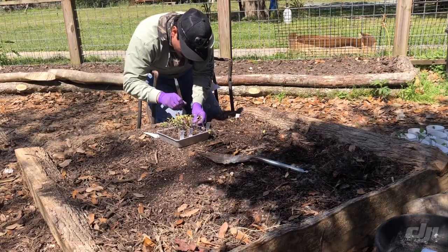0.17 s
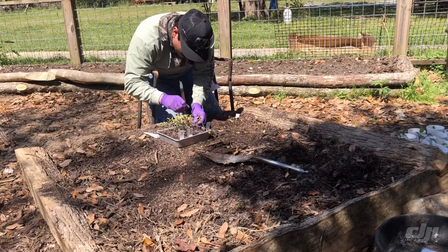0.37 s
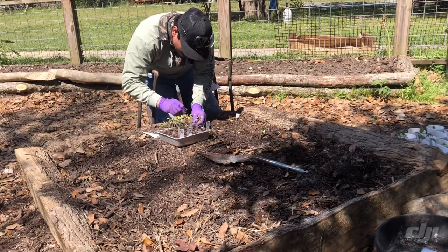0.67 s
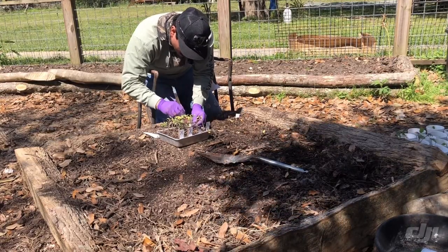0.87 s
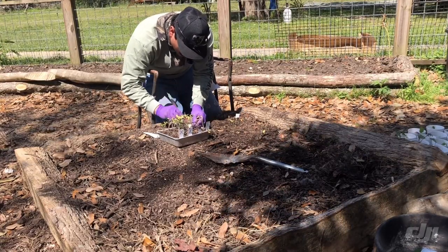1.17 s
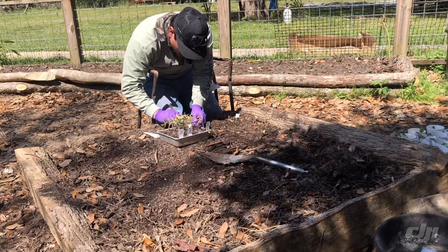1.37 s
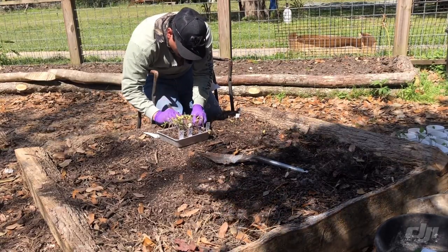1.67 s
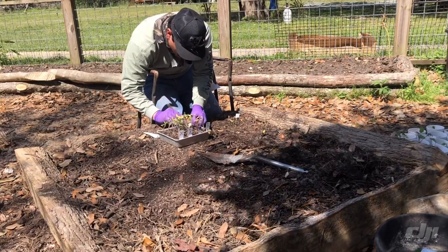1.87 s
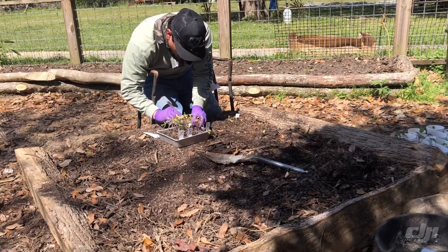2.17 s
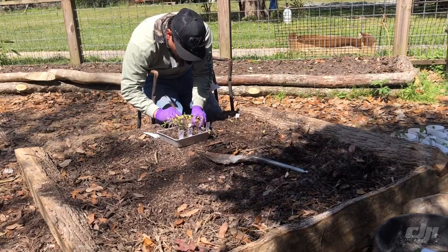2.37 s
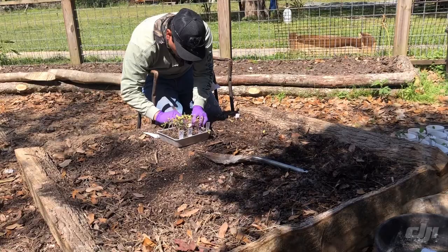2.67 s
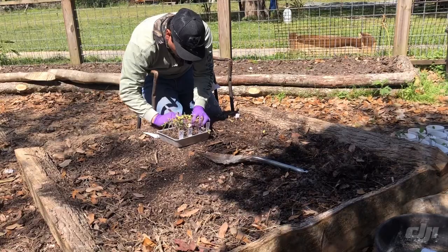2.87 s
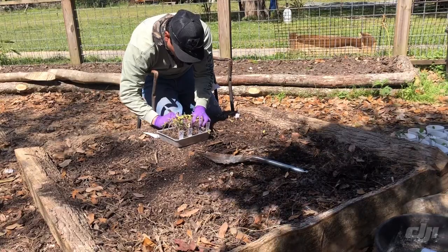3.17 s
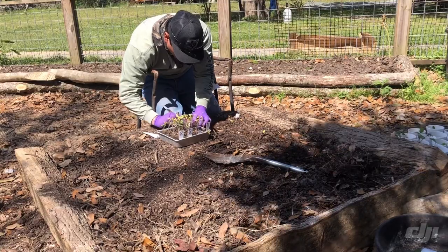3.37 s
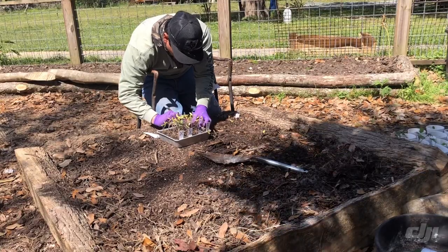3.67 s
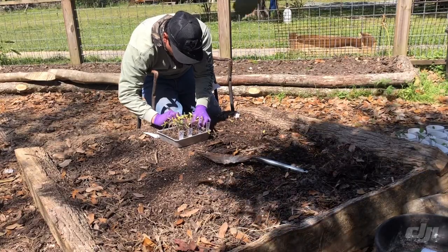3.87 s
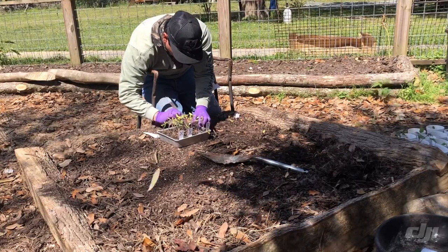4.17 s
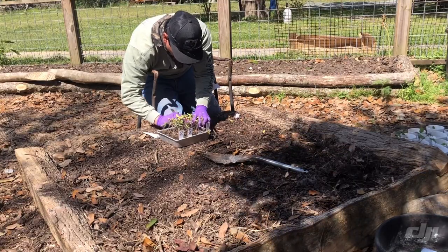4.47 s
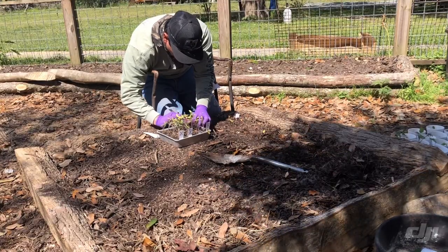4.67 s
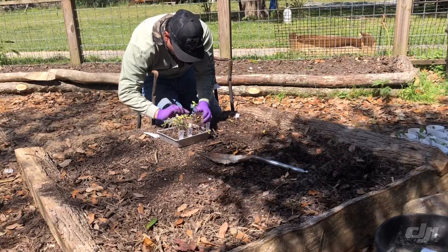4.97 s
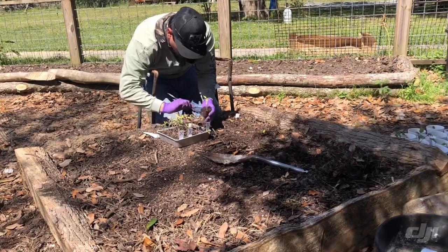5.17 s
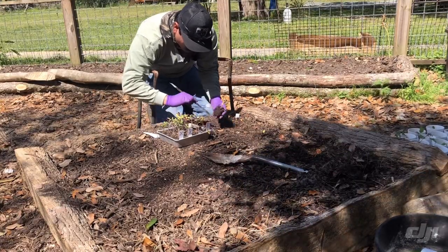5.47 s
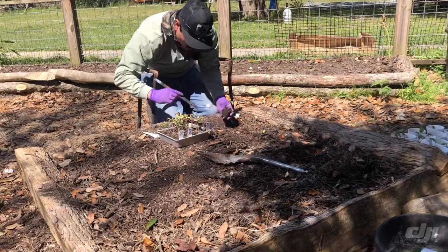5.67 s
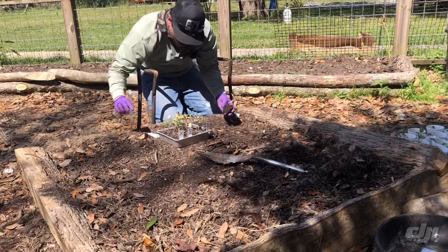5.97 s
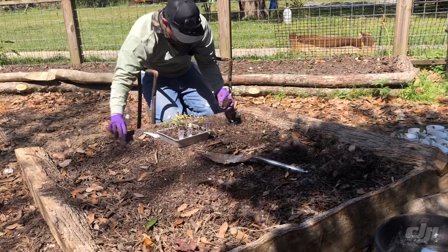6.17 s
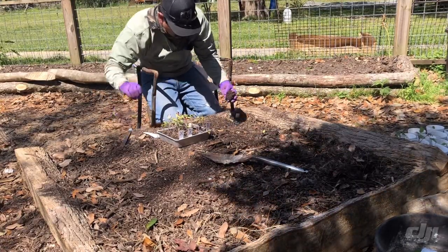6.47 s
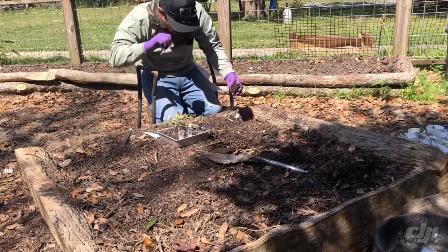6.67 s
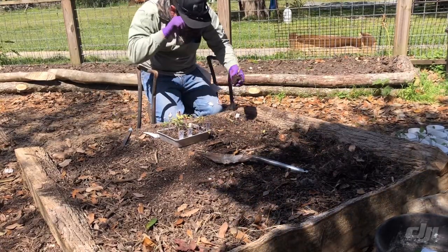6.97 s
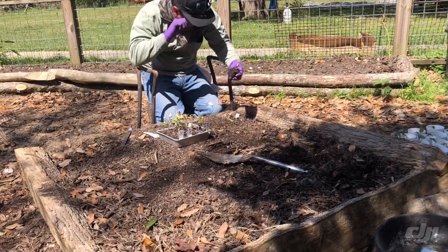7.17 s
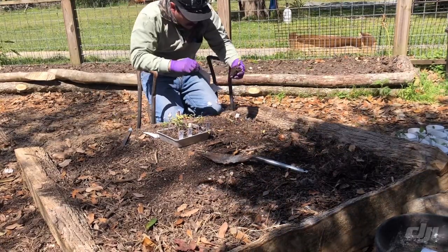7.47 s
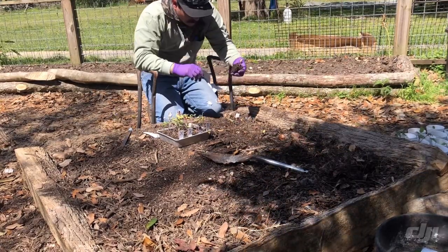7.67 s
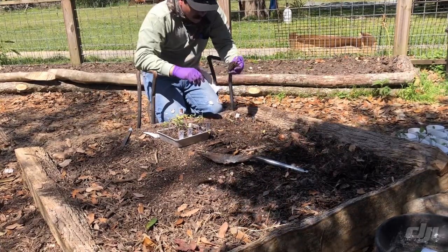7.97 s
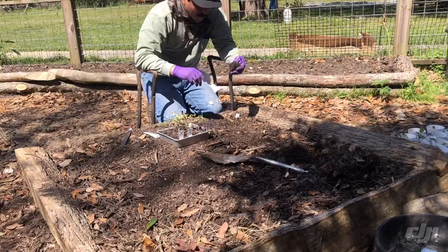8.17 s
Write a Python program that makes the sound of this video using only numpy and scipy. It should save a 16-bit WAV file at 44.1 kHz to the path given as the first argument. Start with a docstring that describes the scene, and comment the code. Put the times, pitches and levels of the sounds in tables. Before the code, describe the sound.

Close muffled cloth bumps and dry soil ticks as a gardener handles seedlings; a far rooster crows hoarsely, then faint bird chirps follow.

```python
"""Rooster across a garden

A rooster crows once far off: pulses of a two-sided syrinx, partly chaotic, pass through throat resonances.
Near by a gardener lifts seedlings from a tray: cloth thumps and rubs on a clip-on microphone (soft pulses),
soil and leaves tick (ringing grains), stems and tray snap (noise bursts) and metal rings in its modes.
Far birds chirp as wavering sines; crow and chirps get scattered echoes, over a wash of coloured noise.
"""
import sys
import numpy as np
from scipy import signal
from scipy.fft import rfft, irfft, next_fast_len
from scipy.io import wavfile
from scipy.ndimage import uniform_filter1d, map_coordinates

SR = 44100
rng = np.random.default_rng(int(sys.argv[2]) if len(sys.argv) > 2 else 0)


def inscribe(sig):
    """Save sig as 16-bit PCM at rate SR to the path in sys.argv[1].

    A 1-D sig is mono; a 2-D sig holds one channel per row.
    Samples are clipped to [-1, 1] before scaling.
    """
    pcm = np.round(np.clip(np.atleast_2d(sig).T, -1, 1) * 32767)
    wavfile.write(sys.argv[1], SR, pcm.astype(np.int16))


N = 367176
TIME = np.arange(N) / SR


def amp(db):
    """Decibels to amplitude ratio."""
    return 10 ** (np.asarray(db) / 20)


def evened(x):
    """Normalisation to rms 1."""
    return x / np.sqrt(np.mean(x ** 2) + 1e-20)


def steadied(x, size=1800):
    """Levelling: division by the running rms over size samples."""
    return x / np.sqrt(abs(uniform_filter1d(x ** 2, size)) + 1e-12)


def read(points, hz):
    """Linear interpolation of a spectrum table on a log-frequency axis."""
    f, value = np.transpose(points)
    return np.interp(np.log(hz + 1), np.log(f), value)


def curves(rows, t):
    """Linear interpolation of each column of a time table at the times t."""
    s, *columns = np.transpose(rows)
    return [np.interp(t, s, c) for c in columns]


def coloured(x, points):
    """Spectral shaping: each frequency is scaled by a table of dB."""
    gain = amp(read(points, np.fft.rfftfreq(len(x), 1 / SR)))
    return irfft(rfft(x) * gain, len(x))


def below(x, hz, order=4):
    """Zero-phase low-pass filtering: forwards, then backwards."""
    sos = signal.butter(order, min(hz, SR * .49), fs=SR, output="sos")
    return signal.sosfiltfilt(sos, x)


def wander(count, hz):
    """Random modulation: noise of rms 1, low-passed at hz."""
    noise = rng.standard_normal(count + 8000)
    return evened(below(noise, hz, order=2)[4000:4000 + count])


def add(mix, s, sound):
    """Superposition: mixes a sound in at time s."""
    part = mix[max(round(s * SR), 0):][:len(sound)]
    part += sound[:len(part)]


def strokes(rows, size=900):
    """Gain envelope of a series of hand movements, their ends softened by a moving average."""
    gates = sum(amp(db) * (TIME > start) * (TIME < end) for start, end, db in rows)
    return uniform_filter1d(gates, size)


def air(level_db=-60, fade_db_per_s=.5, swell_db=1.5):
    """Broadband noise: the dull wash of the outdoors, randomly swelling and slowly dying down."""
    # Each row: frequency in Hz, relative spectral level in dB per Hz.
    spectrum = [(20, -41), (40, -10), (65, 2.5), (120, -1.5), (200, -13), (320, -17.5), (1000, -22.5),
                (2000, -30.5), (3700, -37.5), (9000, -43.5), (15800, -52.5)]
    wash = coloured(rng.standard_normal(N), spectrum)
    middle = below(wash, 4500) - below(wash, 354)  # the band that sets the level
    fade_db = fade_db_per_s * (TIME - TIME.mean())
    return wash / middle.std() * amp(level_db - fade_db + swell_db * wander(N, 13.0))


def soil(idle_db=-75.0, grains_per_s=6000, spread_db=2.0, clump_db=3.5):
    """Granular excitation: crumbs and leaf scraps tick in clumps under the hands, faintly in between."""
    # Hands in soil and leaves. Each row: start in seconds, end in seconds, level in dB.
    rustles = [(.78, .85, -67), (3.66, 3.72, -66), (3.758, 3.79, -67), (3.885, 3.99, -63.5),
               (4.085, 4.21, -67.5), (4.25, 4.3, -67), (4.33, 4.42, -64), (4.48, 4.57, -64),
               (4.67, 4.75, -65.5), (5.298, 5.325, -62), (5.508, 5.53, -61), (6.145, 6.2, -67),
               (6.31, 6.38, -64.5), (6.72, 6.82, -70), (7.314, 7.36, -62), (7.46, 7.53, -69.5),
               (8, 8.15, -71.5)]
    # Colour of the ticks. Each row: frequency in Hz, gain in dB.
    tick_colour = [(300, -26), (1200, -8.5), (2500, 3), (4500, 5), (7000, 4), (10000, 0), (15500, -2)]
    t, ticks = np.arange(256) / SR, np.zeros(N)
    pitches = np.geomspace(1300, 14000, 16)
    for hz in pitches:
        sizes_db = spread_db * np.minimum(rng.exponential(1, N), 4) + clump_db * wander(N, 45)
        signs = rng.choice([-1, 1], N)
        grains = amp(sizes_db) * signs * (rng.random(N) < grains_per_s / len(pitches) / SR)
        # each scrap rings for a few cycles at its own pitch
        ring = np.sqrt(hz) * np.sin(2 * np.pi * hz * t) * np.exp(-hz * t / 0.79)
        ticks += signal.oaconvolve(grains, ring)[:N]
    level = np.hypot(strokes(rustles, size=500), amp(idle_db))
    return evened(coloured(ticks, tick_colour)) * level


def thump(hz, sag=0.42, cycles=1.0, edge_db=-16, edge_ratio=2.185):
    """Damped displacement: a soft pulse sags in pitch as fabric settles, led by a brief brighter catch."""
    u = np.arange(-3, 5, hz / SR)  # time in cycles, the pulse centred at 0
    turns = (1 - np.exp(-sag * u)) / sag
    push = np.exp(-(turns / cycles) ** 2) * np.cos(2 * np.pi * (turns + rng.random()))
    catch_shape = np.exp(-(edge_ratio * (u + .5)) ** 2)
    catch = catch_shape * np.cos(2 * np.pi * (edge_ratio * u + rng.random()))
    return push + amp(edge_db) * catch


def cloth(rub_db=1.5, rub_low_hz=60, rub_high_hz=210, slips_per_s=16, spread_db=3.0):
    """Stick-slip friction: rubbing is a patter of small slips of many pitches, beside single heavy bumps."""
    # Cloth bumping the microphone. Each row: time in seconds, level in dB, pitch in Hz.
    bumps = [(0.676, -25, 149), (0.731, -25, 88.5), (0.85, -29, 378), (.856, -30, 400), (.871, -21.5, 171),
             (0.881, -15.5, 587), (0.891, -17.5, 433), (0.898, -14.5, 209), (.907, -22.5, 380),
             (.931, -25.5, 210), (0.944, -16, 243), (.954, -26.5, 375), (1.06, -33.5, 200),
             (1.243, -29.5, 119), (1.345, -24, 113), (1.87, -26.5, 101), (2.157, -22.5, 315),
             (2.166, -26, 184), (2.302, -23, 132), (2.809, -26.5, 130), (2.826, -29, 147), (2.91, -22, 173),
             (2.926, -24, 76.4), (3.045, -24, 146), (3.16, -31, 226), (3.2, -29, 90.5),
             (3.431, -30.5, 88.1), (3.46, -31, 195), (3.689, -31, 113), (4.274, -33, 161),
             (4.953, -20.5, 266), (4.997, -35, 200), (5.088, -27, 246), (5.153, -25.5, 260),
             (5.41, -26.5, 187), (5.464, -36, 151), (5.544, -23, 125), (5.588, -21.5, 228),
             (5.606, -22.5, 134), (5.741, -30.5, 169), (5.898, -20.5, 116), (6.024, -34, 135),
             (6.112, -23.5, 115), (6.598, -29, 111), (6.618, -28, 106), (6.639, -26.5, 141),
             (6.678, -32.5, 225), (6.693, -29, 80.5), (6.725, -29.5, 108), (6.821, -32, 148),
             (6.842, -44, 950), (6.971, -34.5, 124), (7.016, -34.5, 191), (7.059, -28, 112),
             (7.18, -32, 216), (7.2, -26, 232), (7.229, -25.5, 131), (7.597, -31, 179), (7.652, -28, 108),
             (7.857, -26.5, 155), (7.969, -24.5, 107), (8.091, -32.5, 156)]
    # Cloth rubbing on it. Each row: start in seconds, end in seconds, level in dB before the lift rub_db.
    rubs = [(0.17, 0.25, -44.5), (0.33, 0.64, -49), (0.65, 0.76, -34.5), (0.86, 0.965, -30),
            (0.98, 1.15, -40.5), (1.22, 1.5, -45), (1.72, 1.95, -44), (2.09, 2.23, -35),
            (2.78, 3.27, -40.5), (3.4, 3.82, -46), (3.89, 3.99, -48.5), (4.1, 4.53, -46.5),
            (4.96, 5.2, -35.5), (5.34, 5.67, -35), (5.72, 6.14, -41), (6.58, 6.75, -38.5),
            (6.8, 7.42, -45.5), (7.56, 7.7, -39), (7.84, 8.16, -48)]
    out, rub = np.zeros(N), np.zeros(N)
    for s, db, hz in bumps:
        add(out, s - 3 / hz, amp(db) * thump(hz))  # the pulse centres 3 cycles in
    for hz in np.geomspace(rub_low_hz, rub_high_hz, 10):
        slips = (rng.random(N) < slips_per_s / SR) * amp(spread_db * rng.standard_normal(N))
        rub += signal.oaconvolve(slips, thump(hz))[:N]
    thuds = out + steadied(rub, size=4000) * strokes(rubs) * amp(rub_db)
    return thuds - below(thuds, 32.0, order=2)  # the small capsule loses the deepest bass


def clink(s, modes, db, rise_s, t60):
    """Modal vibration: metal rings in its modes, at once when struck, swelling when scraped."""
    out, t = np.zeros(N), np.arange(SR // 2) / SR
    ring = sum(amp(level) * np.sin(2 * np.pi * hz * t) * (1 + 0.15 * wander(len(t), 60))
               for hz, level in modes)
    add(out, s, amp(db - 60 * t / t60) * ring * (1 - np.exp(-t / rise_s)))
    return out


def metal():
    """Free vibration of two metal bodies: a scraped trowel and later a struck tool."""
    # Modes of the trowel, then of the tool. Each row: frequency in Hz, relative level in dB.
    trowel_modes = [(3321, 1.5), (4760, -2), (6794, -2), (7494, -13)]
    tool_modes = [(1412, -0.5), (2290, -9), (3445, -8), (5120, -11), (5814, -9), (6837, -13), (7620, -10),
                  (9297, -9), (10200, -13), (12700, -9), (14850, -14)]
    scrape = clink(.688, trowel_modes, db=-56.0, rise_s=0.014, t60=0.39)
    return scrape + clink(6.261, tool_modes, db=-53.0, rise_s=.001, t60=0.4)


def snaps(crack_s=0.0011, tail=0.86, crunch_db=4, ring_db=7, ring_width_hz=1500, lead=0.1):
    """Fracture noise: a faint creak, a sharp crack with a broad ring, then a short uneven crunch."""
    # Stems, leaves and the plastic tray, and at 6.26 s the strike of the metal tool. Each row: time in seconds,
    # level of the crack in dB, t60 in seconds, gain of the body below 4.8 kHz in dB, ring in Hz.
    fractures = [(0.714, -52, 0.033, -15, 6840), (0.725, -56.5, 0.12, -8, 4700),
                 (3.0988, -56, 0.07, 9.5, 5230), (3.6489, -58.5, 0.19, 7.5, 7970),
                 (4.143, -68.5, 0.08, 16, 4000), (4.229, -49, 0.038, 0, 4470),
                 (4.374, -63, .025, 7.5, 3800), (4.618, -56, 0.04, -3, 4670), (5.08, -62, 0.035, 6.5, 4370),
                 (5.179, -63, .015, -0.5, 3800), (5.312, -53.5, 0.08, 3, 4850),
                 (5.587, -36, 0.029, -3, 8400), (5.8158, -55, 0.092, -8, 4530),
                 (5.8472, -55.5, 0.091, -2, 8700), (6.072, -58, 0.05, 2.5, 4320),
                 (6.2613, -54, 0.37, 4, 12700), (6.6628, -52, 0.17, 2, 6600),
                 (6.6794, -46.5, 0.11, -24, 6230), (7.6111, -60.5, .02, 0, 4170),
                 (8.014, -58.5, 0.04, -1, 5500), (8.2828, -55, 0.13, -10, 6130)]
    # Colour common to all. Each row: frequency in Hz, gain in dB.
    crack_colour = [(500, 12.5), (1100, 5), (2500, 7.5), (5000, 1), (7500, 2.5), (11000, 1.5), (15500, -2)]
    out, t = np.zeros(N), np.arange(-1024, 7168) / SR
    hz = np.fft.rfftfreq(len(t), 1 / SR)
    for s, db, t60, low_db, ring_hz in fractures:
        crunch = tail * amp(-60 * abs(t) / t60 + crunch_db * wander(len(t), 130))
        shape = np.where(t < 0, lead * crunch, np.exp(-abs(t) / crack_s) + crunch)
        colour_db = read(crack_colour, hz) + ring_db / (1 + ((hz - ring_hz) / ring_width_hz) ** 2)
        burst = irfft(rfft(rng.standard_normal(len(t)) * shape) * amp(colour_db))
        body = below(burst, 4800)
        treble = burst - body
        crack = np.sqrt(uniform_filter1d(treble ** 2, size=180).max())  # loudest treble rms
        add(out, s + t[0], amp(db) * (treble + amp(low_db) * body) / crack)
    return out


def syrinx(hz, halves, jitter, stumble, pull=0, slip=0, taut_hz=820, slack=0.71):
    """Harmonic series of a pulse train; alternate strong and weak pulses add lines between the harmonics."""
    turns = np.cumsum(hz * (1 + jitter * wander(len(hz), 168.6))) / SR
    # each pulse lands a little early or late: low harmonics stay clear, high ones turn to haze
    phase = 2 * np.pi * (turns + pull + stumble * wander(len(hz), 470))
    # slacker membranes, at a lower pitch, close more softly and lose their top
    dull = slack * np.clip(1 - hz / taut_hz, 0, .15)
    # the way across the garden shifts each partial at random
    shifts = 2 * np.pi * rng.random((19, 2))
    pulses = np.zeros(len(hz))
    for k, (a, b) in enumerate(shifts, 1):
        # moving air makes the high partials swell and fade
        fading = amp(min(.35 * k, 3) * wander(len(hz), 16))
        lines = np.cos(k * phase + a) + halves * np.cos((k + .5) * phase + slip + b)
        pulses += fading * np.exp(-dull * max(k - 4, 0)) * lines
    return pulses


def rasping(hz, stumble, chaos=0.04554, lurch=.07, centre=.94, halves=1.0, fickle_db=4.5, slip_hz=70,
            air_share=.2):
    """Chaotic vibration: lurching pitch, fickle sliding subharmonics, a puff of air at each opening."""
    lurching_hz = hz * (centre + lurch * np.tanh(2 * wander(len(hz), 37.86)))
    opening = (1 + np.cos(2 * np.pi * np.cumsum(lurching_hz) / SR)) ** 2
    puffs = evened(rng.standard_normal(len(hz)) * opening)
    fickle = halves * evened(amp(fickle_db * wander(len(hz), 24)))
    slip = 2 * np.pi * np.cumsum(slip_hz * wander(len(hz), 18)) / SR
    pulses = evened(syrinx(lurching_hz, fickle, chaos, stumble, slip=slip))
    return evened(pulses + air_share * puffs)


def settling(t, rasp, lock_s=0.025, rasp_halves=0.3):
    """Mode locking: roughness, share of half lines and lifts of the partials as the voice locks and breaks."""
    # The voice locks out of its rasp into a tone, and each lock favours other partials.
    # Each row: start in seconds, end in seconds, roughness left from 0 to 1, share of half lines,
    # lift in dB of the fundamental, of the second harmonic, of the upper harmonics.
    locks = [(1.297, 1.37, 0.47, 0.1, 4.5, -2.5, -0.5), (1.368, 1.453, 0.08, 0.28, 7, 12.5, 13.5),
             (1.468, 1.51, 0.63, 0.53, 11, -4, 2), (1.622, 1.757, 0.41, 0.15, 1.5, 0, 2.5),
             (1.876, 2.065, 0.08, 0.028, -4, 0.5, 2), (2.182, 2.237, 0.37, 3.1, 2.5, -1.5, -1.5),
             (2.309, 2.394, 0, 0.72, -7, -1, -2), (2.88, 2.974, 0.37, 0.97, 0, 1, -0.5),
             (2.978, 3.151, 0.23, 0.46, -0.5, 6.5, -1.5), (3.162, 3.258, 0.06, 0.06, 11.5, -12, -6),
             (3.278, 3.317, 0.02, .06, 4, 8.5, 2.5)]
    grips = np.array([np.clip(np.minimum(t - start, end - t) / lock_s + .5, 0, 1)
                      for start, end, *_ in locks])
    grips /= np.maximum(grips.sum(0), 1)
    loose = 1 - grips.sum(0)
    rough, halves, *lifts_db = np.array(locks)[:, 2:].T @ grips
    return np.clip(rough + loose * rasp, 0, 1), halves + loose * rasp_halves, lifts_db


def throat(x, resonances):
    """Resonance of a tube: steep-sided peaks with dark valleys, and little below 500 Hz."""
    hz = np.fft.rfftfreq(len(x), 1 / SR)
    gain = sum(amp(db) / (1 + (1.87 * (hz - f) / width) ** 2) ** 2 for f, width, db in resonances)
    return irfft(rfft(x) * gain * (1 - np.exp(-(hz / 500) ** 4)), len(x))


def stretched_throat(x, resonances, stretch):
    """Frequency scaling by time warping: the resonances rise and sink by the moving factor stretch."""
    clock = np.cumsum(stretch) - stretch[0]
    grid = np.arange(next_fast_len(int(clock[-1]) + 2))
    slowed = map_coordinates(x, [np.interp(grid, clock, np.arange(len(x)))])
    return map_coordinates(throat(slowed, resonances), [clock])


def lifted(body, lifts_db):
    """Band weighting of the fundamental, the second harmonic and the upper harmonics."""
    first = below(body, 950, order=8)
    first_two = below(body, 1750, order=8)
    parts = (first, first_two - first, body - first_two)
    return sum(amp(db) * part for db, part in zip(lifts_db, parts))


def voice(t, hz, effort_db, edge_db, beak, roughness):
    """Source and filter: both sides of the syrinx, breaking into rasp, drive a throat shaped by the beak."""
    # Throat resonances with the beak half shut, then wide open.
    # Each row: frequency in Hz, nominal width in Hz, gain in dB.
    shut = [(695, 145, 3), (1020, 820, -6.5), (1572, 104, 2.5), (2106, 690, -9), (3112, 230, -2.5),
            (4750, 1070, -15.5), (6340, 390, -15.5), (6930, 220, -18), (7580, 540, -20), (9050, 1000, -25),
            (12500, 6800, -31)]
    wide = [(785, 1870, -5.5), (1310, 850, 0.5), (1473, 150, 10.5), (1673, 80, 4.5), (1937, 156, -1.5),
            (2823, 210, -2), (5130, 420, -11.5), (6130, 1030, -20), (6980, 300, -18.5), (8120, 410, -24.5),
            (9600, 1100, -40), (12600, 5000, -34)]
    attack_s, release_s = 0.035, 0.032
    other_from_s, other_to_s, other_fade_s = 2.6, 2.88, 0.029
    other_hz, other_halves, other_share, pull_turns = 741, 1, .42, .035
    rough, halves, lifts_db = settling(t, roughness)
    beak = np.clip(beak, 0, 1)
    jitter, stumble = 0.0019 + 0.03 * rough ** 2, 0.0025 + 0.029 * rough

    # the other side holds a lower pitch under the last note and beats against it:
    # the two tug at each other at their beat rate, which puts sidebands round every harmonic
    joined = np.clip(np.minimum(t - other_from_s, other_to_s - t) / other_fade_s + .5, 0, 1)
    pull = pull_turns * joined * np.sin(2 * np.pi * np.cumsum(hz - other_hz) / SR)
    pulses = syrinx(hz, halves, jitter, stumble, pull)
    if joined.any():
        other = syrinx(np.full(len(t), other_hz), other_halves, jitter, stumble, -pull)
        pulses = pulses + other_share * joined * other
    drive = (1 - rough) * evened(pulses) + rough * rasping(hz, stumble)

    shapes = [(1 - beak, shut), (beak, wide)]
    body = below(sum(share * throat(drive, shape) for share, shape in shapes), 4690, order=8)
    stretch = (hz / 790) ** .14  # the upper resonances follow the pitch a little
    top = sum(share * stretched_throat(drive, shape, stretch) for share, shape in shapes)
    grain = amp(2.2 * np.sqrt(rough) * wander(len(t), 260))  # harder closures are shriller
    top = (top - below(top, 4780, order=8)) * grain

    waver_db = 1.2 * wander(len(t), 25)
    call = amp(effort_db + waver_db) * lifted(steadied(body), lifts_db)
    call = call + amp(edge_db - 2.0) * steadied(top)
    flutter = amp(2.0 * rough * wander(len(t), 92))
    fade_in = np.clip((t - t[0]) / attack_s, 0, 1)
    return call * flutter * fade_in * np.clip((t[-1] - t) / release_s, 0, 1)


def rooster():
    """Pitch and pressure control: three syllables scoop and leap to pitch, then a long note arches and falls."""
    # Short opening syllables. Each row: start in seconds, length in seconds, pitch in Hz, time to reach it
    # in seconds, scoop from below and final leap as shares of the pitch, effort in dB,
    # shrill top in dB before a common 2 dB cut, beak opening from 0 to 1.
    syllables = [(1.272, 0.25, 733.3, 0.1, 0.24, .11, -43.5, -56, 0.83),
                 (1.601, 0.5, 809.4, 0.1, 0.19, 0.024, -38.5, -58, 0.13),
                 (2.04, 0.365, 777.7, .245, .1, .02, -39, -58, 0.29)]
    # The long last note. Each row: time in seconds, pitch in Hz, effort in dB,
    # shrill top in dB before the same cut, beak opening from 0 to 1.
    last_note = [(2.39, 788, -38, -60, 1), (2.501, 822.8, -34.5, -58.5, 0.91),
                 (2.68, 823.2, -34.5, -54, 0.99), (2.85, 794, -36.5, -53.5, 1),
                 (2.89, 753.7, -36, -53, 0.92), (3.021, 738, -36, -52, 0.92),
                 (3.123, 729.3, -40.5, -53.5, 0.84), (3.195, 725, -42.5, -50, 0.9),
                 (3.285, 707, -43.5, -52, 1), (3.35, 690, -45.5, -59.5, 0.86),
                 (3.384, 586, -52.5, -65, 0.9)]
    release_s, leap_s, sag_per_s = 0.032, 0.0024, .085
    opening_rasp, last_rasp, fray_s = 0.786, 0.29, 0.057  # roughness from 0 to 1 when not locked
    swell_db, swell_s, droop_db, droop_s = 7, 0.028, 11, 0.02
    treble_follow = 1.8  # dB of shrill top per dB of breath pressure
    out = np.zeros(N)
    for start, length, top_hz, rise_s, scoop, leap, effort_db, edge_db, beak in syllables:
        age = np.arange(0, length + release_s, 1 / SR)
        low = scoop * np.maximum(1 - age / rise_s, 0)
        low = low + leap * (1 - np.tanh((age - rise_s) / leap_s)) / 2
        hz = top_hz * (1 - low - sag_per_s * np.maximum(age - rise_s, 0))
        # the breath pressure builds up at the start and gives way at the end
        push_db = -swell_db * np.exp(-age / swell_s) - droop_db * np.exp((age - age[-1]) / droop_s)
        top_db = edge_db + treble_follow * push_db
        add(out, start, voice(start + age, hz, effort_db + push_db, top_db, beak, opening_rasp))
    t = np.arange(last_note[0][0], last_note[-1][0] + release_s, 1 / SR)
    fray = np.exp((t - t[-1]) / fray_s)  # into full rasp as the air runs out
    add(out, t[0], voice(t, *curves(last_note, t), last_rasp + (1 - last_rasp) * fray))
    return out


def whistle(hz, rise, length_s, tremble=.028, broken_db=2.5):
    """Frequency modulation: a short, broken, wavering whistle arches over its top pitch."""
    u = np.linspace(0, 1, round(length_s * SR))
    arch = rise * (1 - u / rng.uniform(0.55, 0.74)) ** 2
    pitch = hz * (1 - arch + tremble * wander(len(u), 260))
    loudness = np.sin(np.pi * u) * evened(amp(broken_db * wander(len(u), 110)))
    return loudness * np.sin(2 * np.pi * np.cumsum(pitch) / SR)


def bird():
    """Near-sinusoidal tones: a far bird chirps in loose runs; another peeps once, much higher."""
    # Each row: start in seconds, level in dB, top pitch in Hz, rise as a share of the pitch.
    chirps = [(3.478, -63, 2760, 0.05), (3.616, -61, 2790, 0.03), (3.825, -64, 2750, 0.055),
              (4.045, -62, 2770, 0.039), (4.67, -57, 2720, 0.12), (4.9, -60, 2630, 0.076),
              (5.1, -63, 2680, 0.12), (5.905, -63, 7800, .09), (6.43, -62, 2620, .08),
              (6.698, -61, 2600, 0.027)]
    out = np.zeros(N)
    for s, db, hz, rise in chirps:
        add(out, s, amp(db) * whistle(hz, rise, length_s=0.054))
    return out


def garden(x):
    """Scattering: sparse echoes from trees and fences, each band dying at its own speed."""
    # Each row: frequency in Hz, t60 in seconds.
    decay = [(200, 0.21), (700, 0.94), (1500, 0.94), (3000, 1), (6000, 0.35), (14000, 0.034)]
    taps = rng.standard_normal(SR) * (rng.random(SR) < 2000 / SR)
    taps = taps * (np.arange(SR) > .015 * SR)  # no echo before 15 ms
    hz, t, z = signal.stft(taps, SR, nperseg=256)
    tail = signal.istft(z * amp(-60 * t / read(decay, hz)[:, None]), SR, nperseg=256)[1]
    return signal.fftconvolve(x, tail / np.linalg.norm(tail))[:N]


def scene():
    """Superposition of far voices with their echoes and near handling sounds left dry."""
    calls = rooster() + bird()
    far = calls + amp(-15.5) * garden(calls)
    return (far + metal() + cloth() + soil() + snaps() + air())[None]


def record(dry):
    """Band limiting: a steep linear-phase low-pass at 15.9 kHz."""
    taps = signal.firwin(511, 15900, window=("kaiser", 9), fs=SR)
    return signal.oaconvolve(dry, taps[None], "same")


dry = scene()
out = record(dry)
inscribe(out)
```